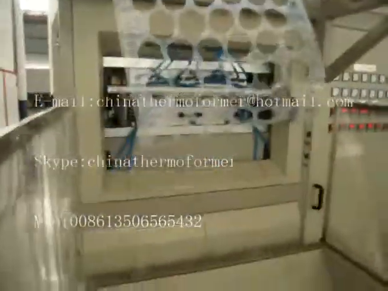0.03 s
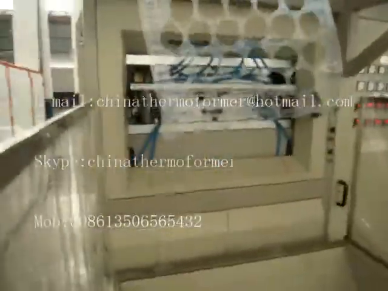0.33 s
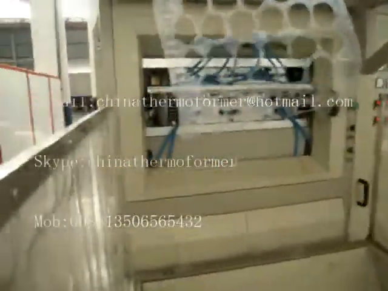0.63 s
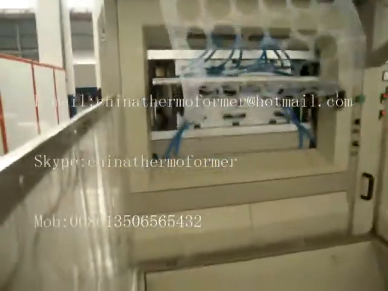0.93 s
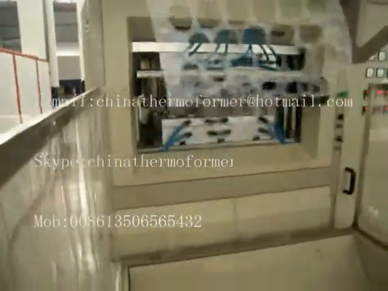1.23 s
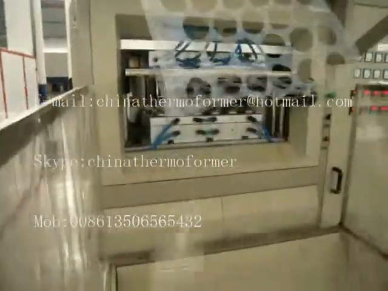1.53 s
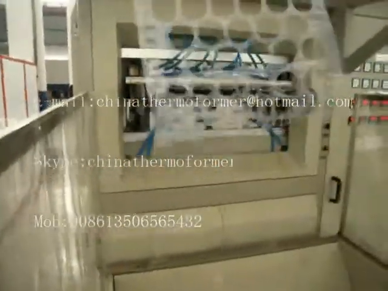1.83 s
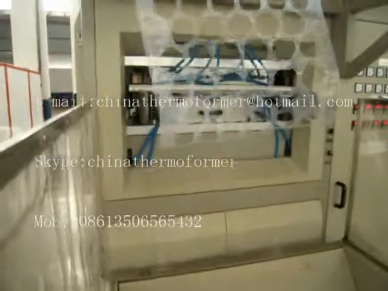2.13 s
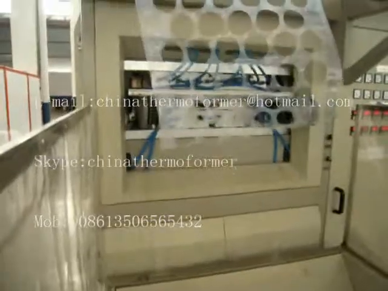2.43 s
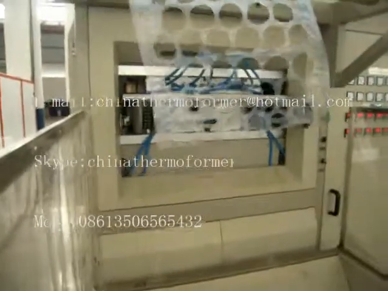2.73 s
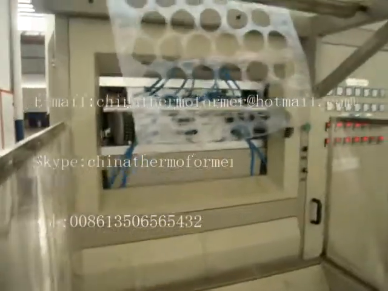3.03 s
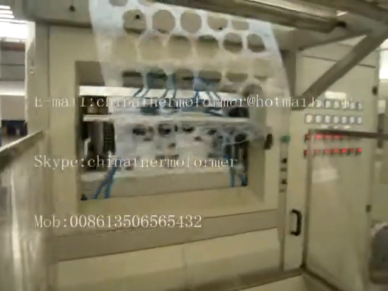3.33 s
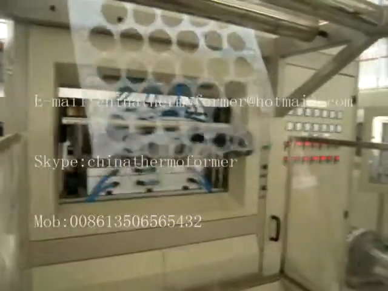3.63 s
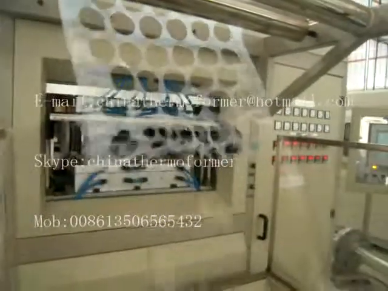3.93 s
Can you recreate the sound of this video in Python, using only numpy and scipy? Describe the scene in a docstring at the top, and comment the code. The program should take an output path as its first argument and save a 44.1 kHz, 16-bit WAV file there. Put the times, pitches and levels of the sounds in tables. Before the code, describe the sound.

A plastic moulding machine cycles in a factory: air hisses, the mould clunks heavily, then steel parts clatter, squeal faintly and clang. The cycle starts again over a steady hum and rumble, close to the microphone.

```python
"""The mould of a thermoforming machine clunks and bumps shut in a 2.4 s cycle in a factory hall.
Each impact excites damped modes: the housing knocks, the frame rings, a steel stop clangs, and steel
parts clatter as the mould travels on squealing guides. Compressed air vents as broadband noise over
the drive's harmonic hum and rumble. A small microphone close by ducks after loud blows and overloads."""
import sys
import numpy as np
from scipy import signal
from scipy.fft import rfft, irfft
from scipy.io import wavfile
from scipy.ndimage import uniform_filter1d

SR = 44100
rng = np.random.default_rng(int(sys.argv[2]) if len(sys.argv) > 2 else 0)


def to_wav(sig):
    """Store sig (one row per channel, or 1-D mono) as 16-bit WAV at the path in sys.argv[1].

    Samples outside -1..1 are clipped; the rate is SR.
    """
    pcm = np.clip(np.atleast_2d(sig), -1, 1) * 32767
    pcm = np.round(pcm).astype(np.int16)
    wavfile.write(sys.argv[1], SR, pcm.T)  # frames by channels


N = 176400
TIME = np.arange(N) / SR
RING = np.arange(int(SR * .5)) / SR  # seconds since an impact

# Clunks of the mould and levers. Each row: start in seconds, level in dB, pitch in Hz,
# t60 (time to decay by 60 dB) in seconds, rattle level in dB.
CLUNKS = [(.001, 1, 135.6, 0.11, -13), (0.582, -3, 269, .06, -14.5), (.645, -10, 322.5, 0.1, -14),
          (.821, 8, 245, 0.077, -7.5), (1.064, -12, 214.5, 0.15, -8), (1.93, -37, 210, 0.044, -12.5),
          (2.351, -9.5, 111, 0.098, -20.5), (2.945, -4.5, 259, 0.064, -7.5), (3.009, -13, 312.3, 0.23, -13),
          (3.199, 3, 248.6, 0.13, -5), (3.439, -5.5, 223, 0.031, -40)]
# Deep bumps. Each row: start in seconds, level in dB, pitch in Hz, relative crunch level in dB.
BUMPS = [(.398, -19, 50, -17.5), (0.859, -2.5, 49.5, -7), (1.255, -21.5, 54.6, -18),
         (2.766, -12.5, 52, -16.5), (3.243, -9, 42, -9)]
# Hollow knocks on the housing. Each row: start in seconds, level in dB, pitch in Hz, t60 in seconds.
KNOCKS = [(.584, -12, 618, 0.17), (.655, -14, 721, .2), (.827, -3, 706, 0.037), (1.066, 0.5, 680, 0.042),
          (1.609, -10.5, 947, 0.092), (1.738, -13, 800, 0.063), (1.782, -14.5, 945, 0.19),
          (1.826, -14.5, 962, 0.11), (1.934, -5.5, 710, .07), (2.361, -6, 534, 0.072),
          (3.011, -5.5, 581, 0.091), (3.205, 5, 860, 0.023), (3.442, 3, 715, 0.037)]
# Modes of the mould and the housing. Each row: ratio to the pitch, level in dB, share of the t60.
BODY_MODES = [(.6, -5.5, 0.43), (1, 3, 0.68), (1.27, -4, 0.96), (1.9, -9, 0.6), (2.7, -6.5, 0.44)]
PANEL_MODES = [(.74, -2.5, 0.5), (.9, -9, 0.86), (1, 2.5, 0.7), (1.14, -13, 1), (1.45, -14.5, 0.48)]
# Pushes of the mould that set the frame ringing. Each row: start in seconds, level in dB.
FRAME_RINGS = [(.648, -19), (3.012, -18.5)]
# Modes of the frame. Each row: frequency in Hz, level in dB, t60 in seconds.
FRAME_MODES = [(304.6, -7, 1.5), (428, -20.5, 0.2), (572, -12.5, 1.8), (671, -4.5, 1.6)]
# Strikes on the steel stop. Each row: start in seconds, relative ring level in dB, crack level in dB.
STRIKES = [(.582, -25, -12.5), (.836, -37, -4.5), (.85, -16, -6), (1.068, -35.5, -18.5),
           (1.609, -31.5, -11), (1.728, -29, -14), (1.744, -60, -13.5), (1.783, -36.5, -14.5),
           (1.827, -35, -15.5), (1.933, -10, -5), (1.956, -6.5, -7), (1.975, -7.5, -16.5),
           (2.001, -10, -23), (2.034, -20, -14), (2.36, -26, -12), (3.214, -9.5, -5), (3.226, -30.5, -6),
           (3.446, -29, -18.5)]
# Modes of the steel parts. Each row: frequency in Hz, t60 in seconds when clattering,
# level in dB when clattering, level in dB when struck.
STEEL_MODES = [(1040, .12, -11, -22), (1088, .2, -10, -22), (1433, .2, -12, -20), (2069, .25, -4, -16),
               (2298, .22, -3, -17), (2375, .13, -7, -15), (3300, .2, 1, -4), (3345, .12, -2, -4),
               (3420, .33, 0, 1), (3480, .12, -4, -4), (3636, .22, -1, -8), (4364, .2, -11, -17),
               (4580, .28, -14, -11), (4700, .14, -11, -18)]
# Steel clatter. Each row: start in seconds, level in dB, length in seconds, tilt in dB per octave.
CLATTERS = [(1.15, -17.5, .05, -7), (1.234, -14, .035, -7), (1.299, -20.5, .035, 1),
            (1.346, -17.5, 0.018, -9), (1.383, -27, .035, 2), (3.528, -18.5, .035, -6.5),
            (3.603, -15.5, .045, -10), (3.678, -18, .06, -13), (3.786, -31.5, .03, -3)]
# Squeals of the guides. Each row: start in seconds, length in seconds, level in dB.
SQUEALS = [(1.17, 0.36, -22), (3.532, 0.34, -21.5)]
# Air vents. Each row: start in seconds, level in dB, rise in seconds, hold in seconds, fall in dB/s.
VENTS = [(0.391, -16.5, .02, 0.038, 56.5), (2.708, -15, 0.079, 0.11, 44)]
# Harmonics of the drive. Each row: multiple of the shaft rate, level in dB.
HUM_HARMONICS = [(2, -34), (3, -25.5), (4, -36.5), (5, -27), (6, -31.5), (7, -34.5), (8, -36), (10, -33),
                 (12, -37)]
# Thin motor whines. Each row: frequency in Hz, level in dB.
WHINES = [(1007, -36), (1178, -41), (1581, -49.5), (2531, -51)]
# The drive's load. Each row: time in seconds, relative levels in dB of rumble, midrange churn and hiss.
LOAD = [(0, -26, -11, -19), (0.098, -16.5, -22, -26.5), (.18, -18.5, -18, -21.5), (0.381, -18, -18, -26.5),
        (0.529, -21.5, -21, -24), (0.718, -31.5, -19.5, -25.5), (.82, -16.5, -16, -24),
        (.97, -24, -17.5, -28.5), (1.13, -23.5, -22.5, -32), (1.42, -24, -22.5, -27.5),
        (1.62, -17, -18.5, -29), (1.879, -21, -17, -26), (2.1, -29.5, -25, -31), (2.302, -21.5, -21, -27),
        (2.619, -13.5, -18.5, -27.5), (2.758, -21.5, -19.5, -33), (2.878, -22.5, -21, -28),
        (3.14, -27, -19, -29.5), (3.35, -26.5, -21.5, -31), (3.5, -25, -23.5, -33.5),
        (3.769, -29, -22.5, -28), (3.919, -22, -22, -27), (4, -13.5, -17.5, -25.5)]
# Noise spectra of impacts, air and drive. Each row: frequency in Hz, relative spectral density in dB.
RATTLE_SPECTRUM = [(60, -6.5), (200, -15.5), (600, 7.5), (1000, -6.5), (1400, -19.5), (2400, -19.5),
                   (3500, -14), (4200, -24), (5000, -39)]
CRUNCH_SPECTRUM = [(60, -10), (130, 12), (260, 15), (500, -2), (1100, 0), (1500, -5), (2300, 1),
                   (3000, -6.5), (3600, -8.5), (4100, -11), (5000, -25.5)]
CRACK_SPECTRUM = [(300, -10), (900, 12.5), (1500, -4), (2300, 8.5), (2900, -0.5), (3450, 5.5), (4000, -9),
                  (4500, -19), (5000, -24.5)]
SCRAPE_SPECTRUM = [(500, 7), (1000, 5), (1600, -9), (2300, 2), (2900, -1.5), (3500, 5.5), (4000, -5.5),
                   (4500, -9), (5000, -23.5)]
AIR_SPECTRUM = [(200, -5), (600, -4), (1100, 0.5), (1400, -1.5), (2000, 1), (2500, 5), (2900, -1),
                (3500, -0.5), (4000, -8.5), (4500, -22), (5000, -21.5)]
RUMBLE_SPECTRUM = [(12, -18.5), (28, 1.5), (60, 1.5), (115, 1), (170, 1.5), (260, -5.5), (500, -29)]
CHURN_SPECTRUM = [(90, -15.5), (180, -6.5), (280, -4.5), (420, -4.5), (700, -7.5), (1050, -10.5),
                  (1350, -23.5), (3000, -48.5)]
HISS_SPECTRUM = [(100, -25.5), (500, -4.5), (1000, -1), (1400, 3.5), (1750, 3), (2200, 6.5), (2900, 1),
                 (3550, 2.5), (3950, -6.5), (4450, -18.5), (5000, -55.5)]


def amp(db):
    """Amplitude grows tenfold for every 20 dB."""
    return 10 ** (np.asarray(db) / 20)


def unit(x):
    """Normalisation brings a signal to rms 1."""
    return x / np.sqrt(np.mean(x ** 2) + 1e-20)


def add(mix, start, sound):
    """Superposition: a sound adds to the mix from its start in seconds."""
    part = mix[max(round(start * SR), 0):][:len(sound)]
    part += sound[:len(part)]


def fade(t60):
    """Damping makes a free vibration decay exponentially, by 60 dB in t60 seconds."""
    return np.exp(-np.log(1000) * RING / t60)


def noise(spectrum, size=len(RING)):
    """Spectral shaping turns white noise into coloured noise of rms 1."""
    hz, db = np.transpose(spectrum)
    shape_db = np.interp(np.log(np.fft.rfftfreq(size, 1 / SR) + 1), np.log(hz), db)
    return unit(irfft(rfft(rng.standard_normal(size)) * amp(shape_db), size))


def wander(rate_hz):
    """Low-pass filtering turns noise into a slow drift of rms 1."""
    size = N // 64
    hz = np.fft.rfftfreq(size, N / size / SR)
    drift = unit(irfft(rfft(rng.standard_normal(size)) * np.exp(-(hz / rate_hz) ** 2), size))
    return np.interp(TIME, np.linspace(0, N / SR, size), drift)


def patchy_noise(spectrum, depth_db=2):
    """Random modulation makes a noise flare in small patches of time and frequency."""
    cells = signal.stft(noise(spectrum, N), nperseg=512, noverlap=384)[2]
    patches = uniform_filter1d(rng.standard_normal(cells.shape), size=3, axis=0)
    patches = unit(uniform_filter1d(patches, size=9, axis=1))
    return unit(signal.istft(cells * amp(depth_db * patches), nperseg=512, noverlap=384)[1][:N])


def blow(modes, hz, t60, rise_s=.0021, grit=.31):
    """An impact starts a few damped modes from rest, in a noisy cloud of lesser ones."""
    ring = sum(amp(db) * np.sin(2 * np.pi * hz * ratio * RING) * fade(t60 * share)
               for ratio, db, share in modes)
    cloud = noise([(hz / 4, -25), (hz * .56, 0), (hz * 1.4, 0), (hz * 2, -16), (hz * 5, -45)])
    return np.minimum(RING / rise_s, 1) * (np.sqrt(2) * ring + grit * cloud * fade(t60))


def beating_mode(hz, t60, spread_hz, neighbours=2):
    """A mode beats against weaker neighbours; together they carry the energy of a single one."""
    cluster_hz = hz + spread_hz * np.append(0, rng.standard_normal(neighbours))
    waves = np.sin(2 * np.pi * (RING[:, None] * cluster_hz + rng.random(neighbours + 1)))
    decay = fade(t60)
    ring = (waves[:, 0] + .48 * waves[:, 1:].sum(1)) * decay
    return ring * np.sqrt(np.sum(decay ** 2) / np.sum(ring ** 2))


def mould_clunks():
    """Impacts of the mould and its levers excite heavily damped body modes and a noisy rattle."""
    out = np.zeros(N)
    for start, db, hz, t60, rattle_db in CLUNKS:
        body = amp(db) * blow(BODY_MODES, hz, t60)
        rattle = amp(rattle_db) * noise(RATTLE_SPECTRUM) * fade(t60=.12)
        add(out, start, body + rattle)
    return out


def mould_bumps(rise_s=.003):
    """Low modes damped within a few periods sound as a deep bump, here with a crunch of noise."""
    out = np.zeros(N)
    for start, db, hz, crunch_db in BUMPS:
        crunch = 2 * amp(crunch_db) * noise(CRUNCH_SPECTRUM) * fade(t60=.17)
        body = amp(db) * blow(BODY_MODES, hz, t60=.09, rise_s=rise_s, grit=.17)
        add(out, start, body + crunch * np.minimum(RING / rise_s, 1))
    return out


def housing_knocks():
    """The inharmonic modes of a struck panel give a hollow knock."""
    out = np.zeros(N)
    for start, db, hz, t60 in KNOCKS:
        add(out, start, amp(db) * blow(PANEL_MODES, hz, t60, rise_s=.0042, grit=.22))
    return out


def frame_ring():
    """Free vibration: the lightly damped frame rings on after the mould is pushed."""
    out = np.zeros(N)
    for start, db in FRAME_RINGS:
        for hz, mode_db, t60 in FRAME_MODES:
            wave = np.sqrt(2) * np.sin(2 * np.pi * (hz * RING + rng.random()))
            add(out, start, amp(db + mode_db) * wave * fade(t60))
    return out


def stop_strikes(damping=1.37):
    """Steel hits its stop and rebounds: a broadband crack and bright modes, then the hall lingers on in a long,
    beating shimmer."""
    out = np.zeros(N)
    for start, ring_db, crack_db in STRIKES:
        ring = sum(amp(db) * beating_mode(hz, t60 / damping, spread_hz=38)
                   for hz, t60, _, db in STEEL_MODES)
        shimmer = amp(-13.5) * beating_mode(hz=3467, t60=.84, spread_hz=55, neighbours=8)
        crack = amp(crack_db) * noise(CRACK_SPECTRUM) * fade(t60=.086)
        add(out, start, amp(ring_db) * (ring + shimmer) / 2 + crack)
    return out


def steel_clatter(hits_per_s=480, detune=.0021):
    """A random train of small collisions keeps the steel modes excited as the mould travels."""
    out = np.zeros(N)
    size = len(RING)
    for start, db, length, tilt in CLATTERS:
        hits = (rng.random(size) < hits_per_s / SR) * rng.uniform(.93, 1, size) * (RING < length)
        hits[0] = 1
        ring = 0
        for hz, t60, mode_db, _ in STEEL_MODES:
            response = beating_mode(hz * (1 + detune * rng.standard_normal()), t60, spread_hz=22)
            partial = signal.fftconvolve(hits, response)[:size]
            ring += amp(mode_db + tilt * np.log2(hz / 2300)) * partial / abs(partial).max()
        # Incoherent noise bursts add in power.
        envelope = np.sqrt(abs(signal.fftconvolve(hits ** 2, fade(t60=.17) ** 2)[:size]))
        scrape = amp(-1) * envelope / envelope.max() * noise(SCRAPE_SPECTRUM)
        add(out, start, amp(db) * (1.09 * ring + scrape))
    return out


def guide_squeals(start_hz=960, end_hz=1115, overtone_ratio=1433 / 1115, settle_s=.11):
    """Sliding friction gives a rough squeal whose pitch rises and settles as the slide gathers speed."""
    out = np.zeros(N)
    for start, length, db in SQUEALS:
        hz = end_hz + (start_hz - end_hz) * np.exp(-np.maximum(TIME - start, 0) / settle_s)
        swell = np.sin(np.pi * np.clip((TIME - start) / length, 0, 1) ** 1.34) ** 2
        for ratio, partial_db in (1, 0), (overtone_ratio, -5.5):
            phase = 2 * np.pi * ratio * np.cumsum(hz) / SR + .78 * wander(40)
            flutter_db = 5.5 * wander(30)
            out += swell * amp(db + partial_db + flutter_db) * np.sin(phase)
    return out


def air_vents():
    """A jet of compressed air radiates broadband noise that decays as the pressure falls."""
    envelope = np.zeros(N)
    for start, db, rise, hold, fall in VENTS:
        opening = np.clip((TIME - start) / rise, 0, 1)
        envelope += opening * amp(db - fall * np.maximum(TIME - start - hold, 0))
    return envelope * patchy_noise(AIR_SPECTRUM)


def jostles(per_s=12, low_hz=93, high_hz=332, spread_db=6):
    """Random impacts of loose parts give damped thumps, stronger when the drive works hard."""
    out = np.zeros(N)
    times, load_db = np.transpose(LOAD)[:2]
    for when, pitch, strength in rng.random((round(per_s * N / SR), 3)):
        start = when * N / SR
        hz = low_hz * (high_hz / low_hz) ** pitch
        db = np.interp(start, times, load_db) - 8 + spread_db * (2 * strength - 1)
        add(out, start, amp(db) * blow(BODY_MODES, hz, t60=.093))
    return out


def drive(shaft_hz=27.38, load_follow=.63):
    """Rotation gives shaft harmonics and motor whines; the hum and running noise swell with the load."""
    times, *levels = np.transpose(LOAD)
    low_db, middle_db, high_db = (np.interp(TIME, times, db) for db in levels)
    hum = np.zeros(N)
    for harmonic, db in HUM_HARMONICS:
        flutter_db = 1.5 * wander(4.5)
        phase = 2 * np.pi * (harmonic * shaft_hz * TIME + rng.random()) + .35 * wander(1.9)
        hum += amp(db + flutter_db) * np.sin(phase)
    hum *= amp(load_follow * (low_db - low_db.mean()))
    whine = sum(amp(db) * np.sin(2 * np.pi * hz * TIME + wander(9.8)) for hz, db in WHINES)
    flicker_db = .5 * wander(40)
    rumble = amp(low_db - 1.5 + flicker_db) * patchy_noise(RUMBLE_SPECTRUM)
    churn = amp(middle_db - .5 + flicker_db) * patchy_noise(CHURN_SPECTRUM)
    hiss = amp(high_db + 2 + flicker_db / 2) * patchy_noise(HISS_SPECTRUM)
    return np.sqrt(2) * (hum + whine) + rumble + churn + hiss


def scene():
    """The machine's sources superpose in one channel."""
    background = drive() + air_vents()
    mould = mould_clunks() + housing_knocks() + frame_ring() + mould_bumps()
    return (background + mould + steel_clatter() + stop_strikes() + guide_squeals() + jostles())[None]


def record(dry, threshold_db=-9, slope=.52, recovery_db_per_s=42.5, lag_s=.06, cutoff_hz=4780):
    """Gain control ducks after loud blows, saturation rounds the peaks and a low-pass cuts the treble."""
    power = signal.lfilter(np.ones(1024) / 1024, [1], dry[0] ** 2)
    # The level detector holds each peak, then falls at a steady rate.
    fall_db = TIME * recovery_db_per_s
    held_db = np.maximum.accumulate(10 * np.log10(power + 1e-9) + fall_db) - fall_db
    excess_db = np.maximum(held_db - threshold_db, 0)
    pole = np.exp(-1 / (lag_s * SR))
    ducked = dry * amp(-slope * signal.lfilter([1 - pole], [1, -pole], excess_db))
    saturated = ducked / (1 + ducked ** 6) ** (1 / 6)
    lowpass = signal.firwin(255, cutoff_hz, window=("kaiser", 7), fs=SR)
    return signal.oaconvolve(saturated, lowpass[None], "same")


dry = scene()
out = record(dry)
to_wav(out)
```